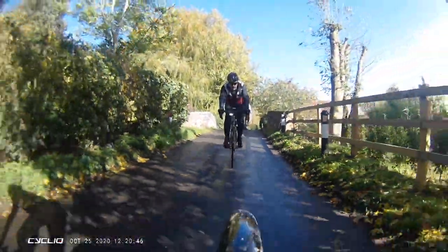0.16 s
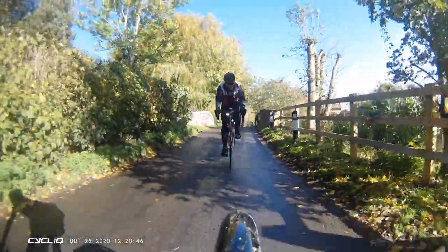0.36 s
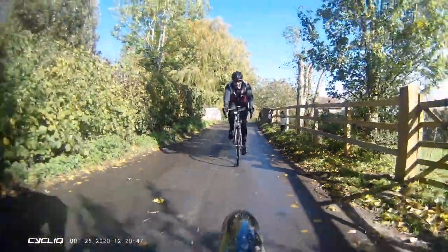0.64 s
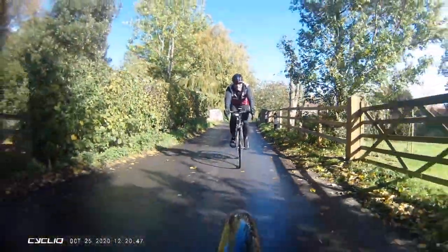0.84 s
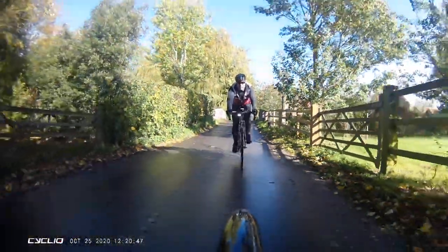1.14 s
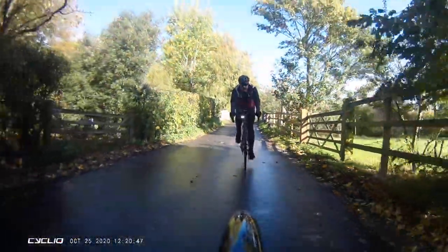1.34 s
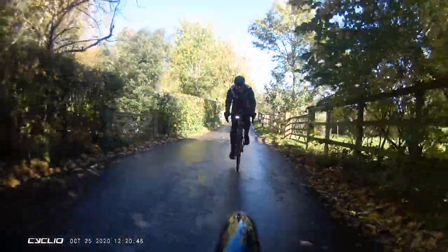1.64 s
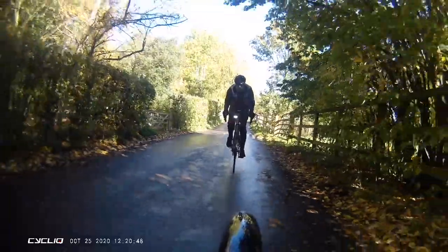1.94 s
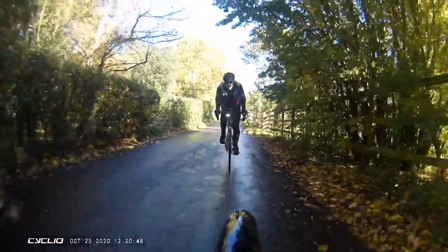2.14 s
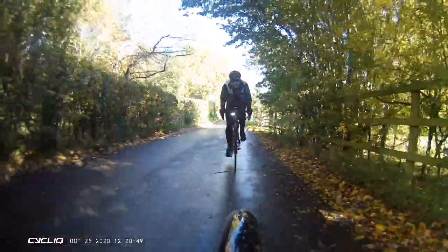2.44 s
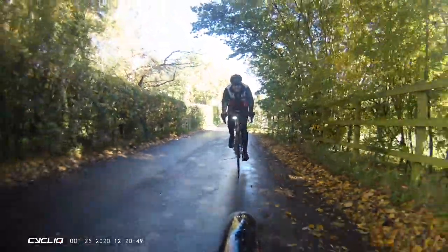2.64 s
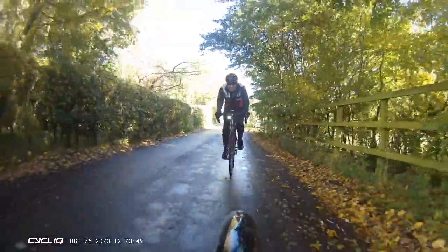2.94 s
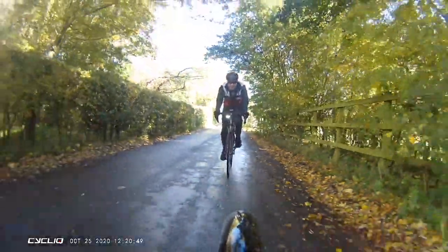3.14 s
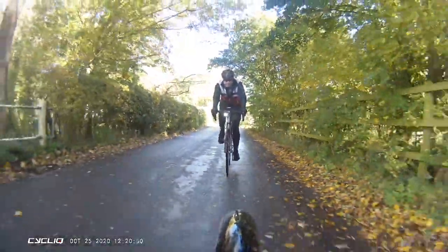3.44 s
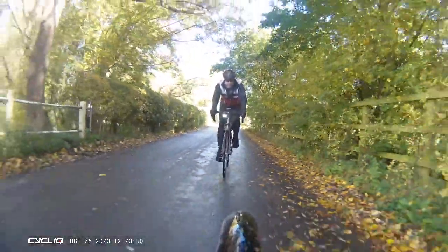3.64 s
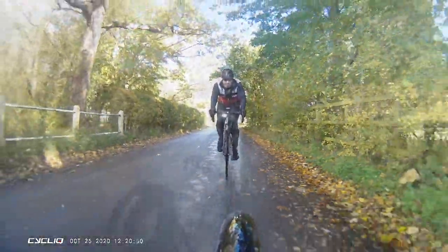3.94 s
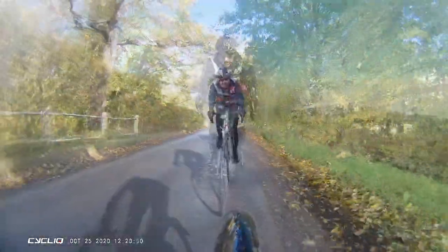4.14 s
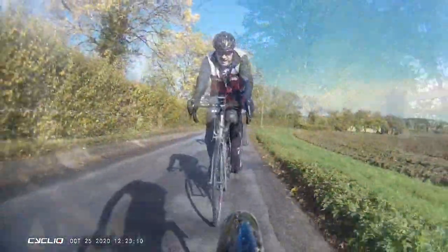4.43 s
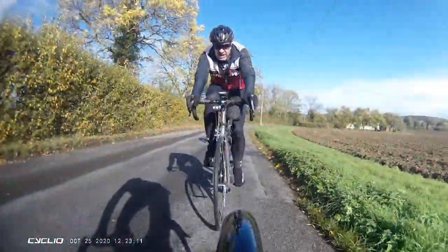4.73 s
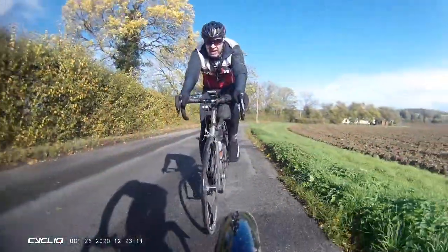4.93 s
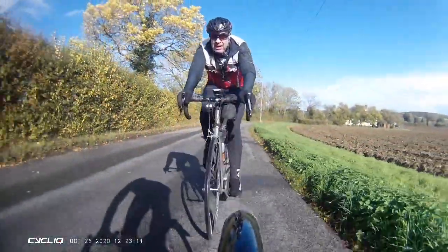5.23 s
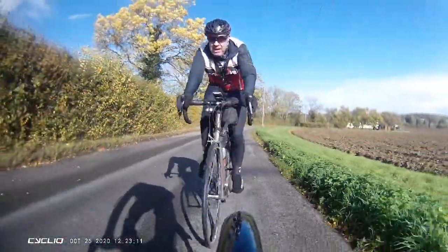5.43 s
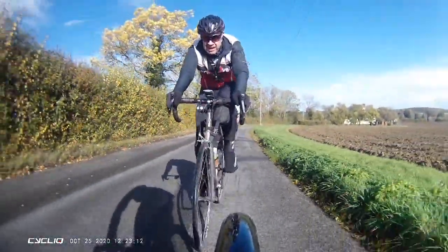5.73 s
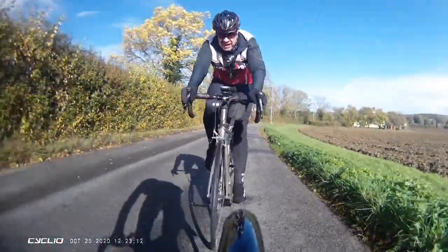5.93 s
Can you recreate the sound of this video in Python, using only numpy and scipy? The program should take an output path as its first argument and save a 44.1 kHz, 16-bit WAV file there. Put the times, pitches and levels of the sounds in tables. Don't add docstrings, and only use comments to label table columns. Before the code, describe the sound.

A six-second bicycle ride heard from inside a small clamped camera, dry and very close. Throughout, a low frame hum and hollow midrange plastic roar tremble under patter of grit and thin, fluttering road hiss. From 0 to 1.4 s hard, brittle ticks and short rattles come thickly, different at left and right, with dull mount knocks around 0.2-0.4, 0.65 and 0.9 s. Clicking continues in irregular clusters near 1.6 and 1.85 s, with a strong right-side burst around 2.4-2.5 s. After a sparser gap, sharp contacts crowd in at 3.1 s and again around 3.5-3.8 s, when the road is roughest. A dense, brighter chatter, mainly right, runs from 4.1 to 4.4 s. The road then smooths: rumble and hiss sink, ticks ring slightly higher, with clusters near 4.7 and 5.3 s. After 5.5 s it is mostly quiet rolling, a few faint taps and a last sharp left click at 6 s.

```python
import sys
import numpy as np
from scipy import signal
from scipy.io import wavfile
from scipy.ndimage import uniform_filter1d

SR = 44100
rng = np.random.default_rng(int(sys.argv[2]) if len(sys.argv) > 2 else 0)


def gain_from_db(level_db):
    decades = np.asarray(level_db, float) / 20
    return 10 ** decades


def wrap_up_sound(samples):
    columns = np.atleast_2d(samples).T
    tamed = np.clip(columns, -1, 1)
    steps = np.round(tamed * 32767).astype(np.int16)
    wavfile.write(sys.argv[1], SR, steps)


N = 268128

# (pitch [Hz], width [Hz], level [dB])
CAVITY_RINGS = [(1683, 880, -7.5), (1920, 536, -3.5), (2910, 476, -0.5), (2818, 346, -2), (3390, 44, 2),
                (3556, 610, -4)]
CAVITY_TOP_HZ = 4460
LEFT_RIGHT = np.array([[-.5], [.5]])


def rms_one(x):
    return x / np.sqrt(np.mean(x ** 2) + 1e-20)


def peak_one(x):
    power = uniform_filter1d(x ** 2, size=40)
    return x / np.sqrt(2 * power.max(axis=-1, keepdims=True))


def in_time(rows):
    s, *columns = np.transpose(rows)
    return [np.interp(np.arange(N) / SR, s, column) for column in columns]


def drift(rate_hz):
    r = np.exp(-80 * np.pi * rate_hz / SR)
    noise = rng.standard_normal(N // 40 + 2002)
    slow = signal.lfilter([1], [1, -2 * r, r * r], noise)[2000:]
    return np.interp(np.arange(N) / 40, np.arange(len(slow)), rms_one(slow))


def low_pass(x, hz, order):
    return signal.sosfilt(signal.cheby1(order, 1, hz, fs=SR, output="sos"), x)


def resonate(x, hz, width):
    r = np.exp(-np.pi * width / SR)
    top = np.array([1, 0, -1]) * (1 - r * r) / 2
    return signal.lfilter(top, [1, -2 * r * np.cos(2 * np.pi * hz / SR), r * r], x)


def colour(x, peaks):
    return sum((-1) ** k * gain_from_db(db) * resonate(x, hz, width) for k, (hz, width, db) in enumerate(peaks))


def treble(x):
    # (pitch [Hz], width [Hz], level [dB])
    crack_peaks = [(5540, 3900, -4), (8000, 4650, -0.5), (9740, 1570, 2), (13500, 10600, -17.5)]
    high_pass = signal.butter(3, 4900, "high", fs=SR, output="sos")
    return signal.sosfilt(high_pass, colour(x, crack_peaks))


def road_hiss(swing_db):
    # (pitch [Hz], width [Hz], level [dB])
    hiss_peaks = [(4830, 1400, -0.5), (7950, 3500, -4.5), (10600, 3400, -4.5), (14200, 5400, -11)]
    level_db = -50.5 + 0.81 * swing_db + 2 * drift(74) - np.array([[3.0], [0]])
    return gain_from_db(level_db) * rms_one(colour(rng.standard_normal((2, N)), hiss_peaks))


def shaken(modes, patchy_db, flutter_hz):
    out = 0
    for hz, width, db, lean_db, alike in modes:
        noise = rng.standard_normal((2, N))
        for _ in range(3):
            noise = resonate(noise, hz, 2 * width)
        mid, side = noise
        alike = np.clip(alike, -1, 1)
        pair = np.sqrt(1 + alike) * mid + np.sqrt(1 - alike) * side * [[1], [-1]]
        out = out + rms_one(pair) * gain_from_db(db + patchy_db * drift(flutter_hz) + lean_db * LEFT_RIGHT)
    return rms_one(out)


def frame_rumble(swing_db):
    # (pitch [Hz], width [Hz], level [dB], right minus left [dB], left-right likeness [-1..1])
    frame_modes = [(40, 52, -12.5, -6, 0.98), (84, 16, -7.5, 5.5, 0.92), (118, 48, -7, 2, 0.96),
                   (233.3, 62.5, 0.5, 4.5, 0.96), (351, 50, 2.5, 2.5, 0.99), (420, 83, -1.5, -6, 0.86)]
    return gain_from_db(-52 + 0.4 * swing_db) * shaken(frame_modes, patchy_db=1.07, flutter_hz=21.0)


def housing_roar(road_db):
    # (pitch [Hz], width [Hz], level [dB], right minus left [dB], left-right likeness [-1..1])
    housing_modes = [(558.3, 96, -9.5, 9.5, -0.31), (730.6, 113, -4.5, -1, -0.44), (896, 240, 2, 3, -0.92),
                     (1255, 157, -8, -2, 1), (1617, 200, -19.5, 13, 0.8)]
    return gain_from_db(road_db + 7.87) * shaken(housing_modes, patchy_db=1.0, flutter_hz=9.9)


def grit_patter(road_db):
    # (pitch [Hz], width [Hz], level [dB], right minus left [dB], left phase [rad])
    grit_modes = [(2074, 540, -6, 0, -1.3), (2543, 210, 0.5, 1.5, -1.5), (3034, 200, 2.5, 2, -3)]
    per_s, spread_db = 500.0, 5.5
    sizes = gain_from_db(spread_db * np.minimum(rng.exponential(1, N), 2))
    strikes = (rng.random(N) < per_s / SR) * sizes + 1e-18
    out = 0
    for hz, width, db, lean_db, turn in grit_modes:
        ring = resonate(resonate(strikes * rng.standard_normal(N), hz, width), hz, 2 * width)
        ring = signal.hilbert(ring)
        turned = np.real(ring / ring.std() * np.exp(1j * turn * np.array([[1], [0]])))
        out = out + gain_from_db(db + lean_db * LEFT_RIGHT) * turned
    return gain_from_db(road_db + 8.0) * rms_one(out)


def knocks():
    # (time [s], peak [dB], pitch [Hz], overtone against it [dB])
    knock_rows = [
        (0.216, -26, 790, 6.5),
        (0.259, -20.5, 875, 3),
        (0.356, -17, 905, -5),
        (0.372, -30.5, 635, 6),
        (0.638, -23, 960, 0),
        (0.849, -42.5, 630, 18),
        (0.88, -39, 620, 19),
        (0.905, -23, 716, 1),
    ]
    overtone, width_hz = 2.12, 460
    out = np.zeros(N)
    push = np.r_[1., np.zeros(599)]
    for s, db, hz, over_db in knock_rows:
        low, high = (peak_one(resonate(resonate(push, f, width_hz), f, width_hz))
                     for f in (hz, overtone * hz))
        start = round(s * SR)
        out[start:start + 600] += gain_from_db(db + 1.5) * (low + gain_from_db(over_db) * high)
    return out * gain_from_db(3 * LEFT_RIGHT)


def crackle(level_db, loud):
    stir_db, per_s, clump_db, treble_db = -4.5, 1600.0, 2.0, -37.0
    stir = uniform_filter1d(uniform_filter1d(abs(loud), size=900), size=500)
    level = gain_from_db(level_db) + gain_from_db(stir_db) * stir
    sizes = gain_from_db(4.0 * np.minimum(rng.exponential(1, N), 2)) * rng.standard_normal(N)
    born = rng.random(N) < per_s / SR
    grains = (sizes * born + 1e-18) * gain_from_db(clump_db * np.clip(drift(110), -2.5, 1.1))
    favoured = rng.integers(0, len(CAVITY_RINGS), N // 64 + 1).repeat(64)[:N]
    rings = 0
    for k, (hz, width, db) in enumerate(CAVITY_RINGS):
        rings = rings + gain_from_db(db) * resonate(grains * (0.23 + (favoured == k)), hz, width)
    rings = rms_one(low_pass(rings, CAVITY_TOP_HZ, order=4))
    calm = rms_one(resonate(rings, hz=2440, width=2540))
    bright = gain_from_db(treble_db) * (level / 0.2) ** .5 * rms_one(treble(grains))
    return gain_from_db(level_db) * calm + gain_from_db(stir_db) * stir * rings + level * bright


def small(rows, ms):
    return [(s, db, ms, treble_db) for s, db, treble_db in rows]


def dull(rows):
    return [(s, db, -22) for s, db in rows]


def left_contacts():
    # (time [s], peak [dB], length [ms], treble under the ring [dB])
    big = [(0.344, -13, 3.4, -26), (0.3594, -9.5, 2.2, -15.0), (0.4202, -16, 2.2, -20),
           (0.4231, -16, 2.7, -18), (0.4372, -10.0, 1.9, -12), (0.4524, -11, 1.2, -26),
           (0.518, -12.5, 1, -18), (0.5215, -8.5, 1, -17.5), (0.5236, -16, 1.3, -25),
           (0.5657, -13.0, 1.8, -13), (0.5864, -11, 2.4, -25), (0.5962, -8.0, 0.97, -10),
           (0.6672, -8.5, 3.3, -16), (0.6788, -16, 1.3, -22), (0.688, -7, 4.6, -10.5),
           (0.6918, -12, 1.5, -10), (0.9068, -14.5, 3.1, -15), (0.9749, -7, 3.1, -9),
           (1.137, -9.5, 1.5, -12.0), (1.2631, -11.5, 1.4, -11), (1.2804, -10, 1.6, -14.5),
           (1.2952, -11.0, 2.3, -13), (1.2983, -12, 1.8, -26), (1.5446, -16.5, 2.5, -17),
           (1.5905, -11, 1.4, -27.0), (1.5934, -15, 1.4, -21.0), (1.906, -13.5, 2.4, -17),
           (2.3231, -10.5, 1.3, -18.5), (2.529, -8.5, 1.1, -17.5), (3.1607, -6, 0.71, -17),
           (3.1636, -12.0, 1.3, -19), (3.1696, -14, 2.8, -13), (3.1776, -8, 3.6, -10.5),
           (3.3986, -13.5, 1.1, -17), (3.6965, -22, 1.3, -28.0), (4.0024, -13.0, 1, -16.0),
           (4.018, -11.5, 1.1, -13), (4.0637, -13, 1.5, -13), (4.0682, -12.0, 1.2, -19),
           (4.0762, -12.5, 5.6, -10), (4.1318, -9, 1.9, -16), (4.16, -14, 1.7, -26),
           (4.2334, -17, 1.1, -11), (4.538, -13, 1.2, -25), (4.5678, -10.0, 1.6, -10),
           (4.573, -16, 1.4, -17), (4.7124, -15.5, 1.7, -14), (5.018, -14.0, 1.6, -29),
           (5.4806, -10.5, 0.65, -13.5), (6.0074, -7, 1, -29)]
    # (time [s], peak [dB])
    little = [(0.1005, -21), (0.1324, -19), (0.2344, -16), (0.2546, -16), (0.2625, -15), (0.3276, -16),
              (0.33, -16), (0.3403, -17), (0.4352, -15), (0.4941, -14), (0.5063, -17), (0.6093, -18),
              (0.6319, -16), (0.6945, -14), (0.7003, -18), (0.7498, -20), (0.85, -19), (0.8729, -15),
              (0.9159, -17), (0.9411, -18), (0.9439, -15), (0.9836, -19), (1.17, -19), (1.2306, -14),
              (1.2349, -17), (1.2541, -14), (1.2577, -17), (1.288, -17), (1.292, -14), (1.3071, -14),
              (1.3254, -15), (1.3455, -20), (1.4971, -19), (1.5042, -17), (1.5413, -16), (1.5605, -18),
              (1.5768, -17), (1.8258, -20), (2.0529, -19), (2.1685, -17), (2.5333, -17), (2.7507, -15),
              (2.8485, -16), (3.0266, -20), (3.1378, -14), (3.1542, -15), (3.4865, -19), (3.5668, -18),
              (3.6434, -21), (3.6749, -16), (3.6853, -17), (3.8965, -21), (4.153, -17), (4.5767, -17),
              (4.6469, -19), (4.7051, -20), (5.1206, -23), (5.2887, -19), (5.328, -20), (5.7725, -16)]
    # (time [s], peak [dB], length [ms], treble [dB])
    rattles = [(0.0084, -14, 2.6, -20.5), (0.0635, -20, 2.1, -15), (0.2193, -16.5, 3.7, -15),
               (0.3172, -16.5, 2.7, -14.5), (0.362, -19.0, 2.2, -15.0), (0.375, -17, 3.5, -13.0),
               (0.4577, -17, 2.1, -21.0), (0.5928, -18, 2.2, -26.0), (0.6427, -15, 2.1, -15.0),
               (0.6811, -19, 2.7, -22), (0.7679, -14.5, 3.4, -24), (0.8785, -22, 1.9, -26.0),
               (0.9881, -20, 2.2, -23), (1.0407, -23, 2.4, -20.0), (1.0474, -21, 4.6, -19),
               (1.0795, -19, 2.3, -19.0), (1.3094, -13, 3.2, -18), (1.3174, -10, 4.3, -14),
               (1.3431, -18, 2.3, -21.0), (1.5812, -19.0, 2.1, -24.0), (1.6477, -16.5, 1.8, -20.0),
               (1.6513, -21.0, 2.7, -18.0), (1.7243, -20, 1.9, -18), (1.9029, -25, 3.2, -12.0),
               (2.1109, -22, 2.1, -22.0), (2.1198, -28, 1.7, -24.0), (2.1568, -25, 2.1, -24.0),
               (2.2334, -19, 3.1, -14), (2.4991, -18, 2.4, -13), (2.7399, -27, 2.6, -24.0),
               (2.8462, -22, 2.5, -27), (3.1332, -14, 3.8, -20), (3.4909, -17.0, 3.8, -20.0),
               (3.5809, -19.0, 2, -20.0), (3.6777, -21.0, 2.6, -13.0), (3.7711, -18.0, 3.9, -27.0),
               (3.7976, -23.5, 2.3, -21), (4.0049, -19, 2.5, -18), (4.0165, -13, 1.7, -12),
               (4.0722, -17, 2.2, -18.0), (4.15, -18.0, 3.1, -20), (4.2131, -21, 2.9, -24),
               (4.3014, -20, 2.3, -14), (4.556, -20.0, 2, -19), (4.5622, -20, 3.3, -17),
               (4.6944, -25, 3.2, -13), (5.0281, -22, 4.7, -21), (5.2649, -16, 2.3, -20),
               (5.3331, -19.0, 3.1, -28), (6.0052, -26, 2, -8)]
    return list(big) + small(dull(little), ms=1.0) + list(rattles)


def right_contacts():
    # (time [s], peak [dB], length [ms], treble under the ring [dB])
    big = [(0.084, -12, 2.3, -7), (0.147, -10.5, 2.1, -12), (0.1534, -11.5, 2.8, -4),
           (0.1615, -8.5, 2.4, -9), (0.1677, -12, 2.2, -8.5), (0.3843, -11, 4.8, -6),
           (0.4007, -10, 2.3, -7), (0.4123, -8.0, 2.4, -11.5), (0.5643, -10, 1.3, -15),
           (0.7917, -7, 3.1, -11.0), (0.9041, -11.0, 2.2, -18), (0.9815, -11, 1.3, -9),
           (0.9917, -7, 1.5, -8), (1.0126, -9, 2.3, -12), (1.0404, -7, 1.2, -12), (1.2105, -7.5, 3.2, -5.5),
           (1.2519, -14, 1.3, -6), (1.5642, -11.5, 1.8, -16.5), (1.6071, -9.5, 1.8, -9.5),
           (1.6098, -12, 2.5, -12.5), (1.839, -8.5, 3.4, -15.0), (1.8572, -10, 5.8, -9.5),
           (2.2301, -8.0, 1.7, -7.5), (2.403, -5.5, 1.9, -12.0), (2.458, -6.5, 2.0, -13.0),
           (2.4691, -10, 3, -9.5), (2.4746, -7, 1.3, -5), (2.4784, -7.5, 2.6, -15), (2.669, -8.0, 1.9, -17),
           (2.8599, -10.5, 1.9, -7), (2.8666, -11, 3.3, -16.5), (3.1027, -10, 2.3, -15.0),
           (3.1047, -11, 1.3, -5), (3.1076, -11.5, 1.9, -7), (3.1122, -8.5, 3.5, -7.5),
           (3.279, -11, 1.5, -26), (3.4643, -9, 1.9, -15), (3.621, -13.5, 1.2, -12),
           (3.7005, -12, 1.4, -8.5), (3.721, -11, 2.3, -13), (3.7486, -10, 2.6, -10.0),
           (3.8267, -9.5, 1.8, -16), (4.5033, -9.5, 2.1, -9), (4.5129, -11.5, 2.9, -9.5),
           (4.6592, -11.5, 2.5, -15), (4.7096, -7.5, 1.04, -11.5), (4.9204, -10.5, 1.4, -22.0),
           (5.3093, -8.5, 0.99, -17.5), (5.3512, -7.0, 4, -9), (5.3888, -11.5, 2.4, -18)]
    # (time [s], peak [dB], treble under the ring [dB])
    little = [(0.0998, -12, -27.0), (0.1045, -13.0, -19), (0.1458, -10, -14.0), (0.1889, -11, -16),
              (0.2579, -9, -22.0), (0.2624, -11.5, -11.5), (0.3744, -10, -12.0), (0.3968, -7, -16.0),
              (0.5736, -16, -16), (0.8022, -17, -19), (0.8095, -15, -25.0), (1.0944, -19, -11),
              (1.1696, -16, -27), (1.2462, -13, -20.0), (1.3442, -14.0, -23.0), (1.5163, -15.5, -14.0),
              (1.5291, -11, -20.0), (1.613, -17, -20.0), (1.8143, -15.0, -18.0), (1.8628, -13.0, -15),
              (1.866, -13, -16), (1.895, -11.5, -14.5), (1.9085, -10, -19), (2.2492, -11.5, -13),
              (2.2787, -13.5, -17), (2.3646, -14.5, -25.0), (2.4462, -16, -20.0), (2.4651, -16, -12),
              (3.0727, -13, -27), (3.0991, -14.0, -23.0), (3.1163, -15, -23.0), (3.451, -15.5, -21.0),
              (3.5619, -17, -27), (3.5764, -8, -16), (3.5946, -17, -25.0), (3.7434, -7.5, -14),
              (4.1412, -9, -7.0), (4.146, -8, -18), (4.3054, -15.0, -12.0), (4.3077, -13, -15.0),
              (4.3524, -9, -11), (4.3619, -13.0, -15.0), (4.3657, -10, -13.0), (4.377, -10, -13.0),
              (4.4608, -12, -12.0), (4.6479, -17, -15), (4.6518, -15, -17), (4.6555, -15, -15),
              (4.6738, -14, -24.0), (4.7121, -9, -15.0), (4.9165, -12.0, -17), (4.9594, -12, -18.0),
              (5.0915, -10.5, -24), (5.3065, -23, -12), (5.3153, -11.5, -24.0), (5.3588, -18, -16),
              (5.4101, -14.5, -14.5), (5.4123, -15.5, -17.0), (6.0046, -15.5, -19), (6.0076, -15.0, -11)]
    # (time [s], peak [dB])
    taps = [(0.327, -17), (0.5479, -17), (0.8728, -17), (1.1939, -16), (1.2832, -17), (1.71, -17),
            (1.777, -16), (1.8795, -18), (2.0451, -18), (2.4144, -16), (2.4296, -16), (3.7129, -16),
            (3.8795, -18), (4.1048, -17), (4.1105, -17), (4.1389, -14), (4.16, -14), (4.288, -17),
            (4.3873, -16), (4.3927, -16), (4.401, -16), (4.441, -16), (4.4545, -17), (5.3636, -17),
            (5.385, -16)]
    # (time [s], peak [dB])
    pats = [(0.044, -18), (0.0776, -17), (0.2091, -18), (0.2342, -16), (0.3542, -18), (0.4457, -18),
            (1.1495, -18), (1.7309, -18), (1.8179, -17), (2.1196, -18), (2.5039, -17), (2.7507, -18),
            (3.5664, -17), (3.6853, -18), (3.7565, -17), (3.7976, -18), (4.1711, -17), (4.5256, -18),
            (4.5397, -18), (4.5444, -18), (4.7509, -21), (4.9515, -20), (5.3813, -19), (5.732, -19),
            (5.9779, -20)]
    # (time [s], peak [dB], length [ms], treble [dB])
    rattles = [(0.1641, -19, 2.2, -19), (0.1715, -15, 4.3, -15.0), (0.2192, -15.5, 3.8, -9),
               (0.3599, -9, 3.3, -18), (0.4053, -15, 2.2, -8), (0.5563, -15, 2.1, -24),
               (0.5664, -10, 2.0, -23), (0.642, -20, 2.6, -12), (0.6445, -18, 4, -13),
               (0.9014, -21, 4.4, -17), (0.9067, -12.5, 2.5, -11), (1.008, -14, 5.2, -20),
               (1.016, -11.5, 3.5, -10), (1.0713, -15, 2.6, -20), (1.102, -16.5, 2.6, -26.0),
               (1.265, -13, 4.3, -24), (1.331, -10, 2.6, -14), (1.845, -11, 2.7, -11),
               (1.8486, -14, 4.4, -6.5), (2.028, -15.5, 2.3, -35), (2.2263, -19, 2.0, -16.0),
               (2.3363, -13.5, 2.1, -31.0), (2.67, -10, 2.0, -18), (3.4479, -12.5, 3.2, -27),
               (3.4537, -23, 1.7, -21.0), (3.5843, -13, 3.3, -17.5), (3.6747, -12, 1.7, -13),
               (3.6972, -13.0, 2.1, -27), (3.731, -13, 3.2, -24.0), (4.1, -10.5, 4.5, -12),
               (4.1162, -13, 3.6, -16.0), (4.1205, -16, 2.8, -3), (4.123, -15, 2.8, -4),
               (4.127, -12.0, 3.2, -7), (4.134, -13, 3.9, -6), (4.152, -13, 3.2, -3), (4.1574, -12, 5, -6),
               (4.1832, -14.5, 7.2, -8.5), (4.2268, -14.5, 2.9, -4), (4.2977, -14.5, 3.5, -12),
               (4.3201, -12.5, 7.8, -8.5), (4.3393, -15, 5.2, -6), (4.3458, -18.5, 4.3, -8.0),
               (4.359, -12, 2.8, -10), (4.3827, -14, 3.8, -8.5), (4.3968, -13.5, 3.1, -14),
               (4.6818, -10, 3.2, -16), (4.947, -16.0, 2.7, -19.5), (5.0627, -18.0, 2.9, -21),
               (5.2668, -16, 2.2, -23)]
    singles = list(little) + dull(list(taps) + list(pats))
    return list(big) + small(singles, ms=1.0) + list(rattles)


def pitched(rows):
    wet_hz, dry_hz, dry_from_s, spread = 3217, 3630, 4.25, 0.067
    out = []
    for (s, db, ms, treble_db), a in zip(rows, rng.standard_normal(len(rows))):
        hz = (wet_hz if s < dry_from_s else dry_hz) * (1 + spread * a)
        out.append((s, db, hz, ms, treble_db))
    return out


def evened(x, share):
    return x / uniform_filter1d(x ** 2, size=30) ** (share / 2)


def ticks(rows):
    width_hz, cavity_share, late_s, tick_db, crack_db = 440, 0.7, .0002, 0.17, -0.67
    blur_ms, rise_power, fall_power, crack_power = 0.27, 1.7, 1.2, 1.93
    size, lead = 900, 397
    t = np.arange(size) / SR - .009
    s, db, hz, ms, treble_db = np.transpose(rows)[:, :, None]
    contacts = rng.standard_normal((len(rows), size))
    half_s = np.sqrt(np.maximum(ms ** 2 - blur_ms ** 2, .3)) / 2000
    shape = np.exp(-np.log(2) * abs(t / half_s) ** np.where(t < 0, rise_power, fall_power))

    own = np.array([resonate(c, f, width_hz) for c, f in zip(contacts, hz[:, 0])])
    ring = evened(own + cavity_share * colour(contacts, CAVITY_RINGS), share=0.72)
    ring = low_pass(shape * ring, CAVITY_TOP_HZ, order=3)

    crack = treble(shape ** crack_power * contacts * abs(contacts))
    dullness = np.clip(-treble_db / 9 - 1.6, 0, 1)
    crack = (1 - dullness) * crack + dullness * 2 * low_pass(crack, 7500, order=2)

    sounds = gain_from_db(db + tick_db) * (peak_one(ring) + gain_from_db(treble_db + crack_db) * peak_one(crack))
    starts = np.round((s[:, 0] - late_s) * SR).astype(int)
    out = np.zeros(N + 1400)
    for start, sound in zip(starts, sounds):
        out[start:start + size] += sound
    return out[lead:lead + N]


def near_microphones():
    # (time [s], level [dB], right minus left [dB])
    grit_rows = [(0.0, -33, 3), (0.52, -33, 2), (0.8, -32.5, 4), (1.2, -33.5, 3), (1.34, -36.5, 5),
                 (1.79, -31, -1), (2.15, -35.5, 1), (2.37, -33, 6), (2.69, -35, 0.5), (3.71, -33, 3),
                 (3.96, -38, 1), (4.32, -30.5, 3.5), (4.52, -33, 9.5), (4.72, -36.5, 7), (4.96, -41.5, -1),
                 (5.21, -34, 7.5), (5.5, -40, 2.5), (6.08, -36, 0)]
    grit_db, lean_db = in_time(grit_rows)
    near = []
    for side, contacts in ((-.5, left_contacts()), (.5, right_contacts())):
        loud = ticks(pitched(contacts))
        near.append(loud + crackle(grit_db + side * lean_db - 2.5, loud))
    return np.array(near)


def scene():
    # (time [s], level [dB])
    road = [
        (0.0, -40),
        (2.29, -40.5),
        (3.64, -39),
        (3.98, -41),
        (4.15, -44.5),
        (5.49, -47),
        (6.08, -44),
    ]
    road_db, = in_time(road)
    swing_db = road_db - road_db.mean()
    shake = frame_rumble(swing_db) + housing_roar(road_db) + grit_patter(road_db)
    return road_hiss(swing_db) + shake + knocks() + near_microphones()


def band_limit(x):
    return signal.sosfilt(signal.butter(12, 16990, fs=SR, output="sos"), x)


def record(dry):
    rounded = dry / (1 + (dry / .68) ** 4) ** .25
    finished = low_pass(rounded, 15780, order=8)
    return band_limit(finished)


dry = scene()
out = record(dry)
wrap_up_sound(out)
```